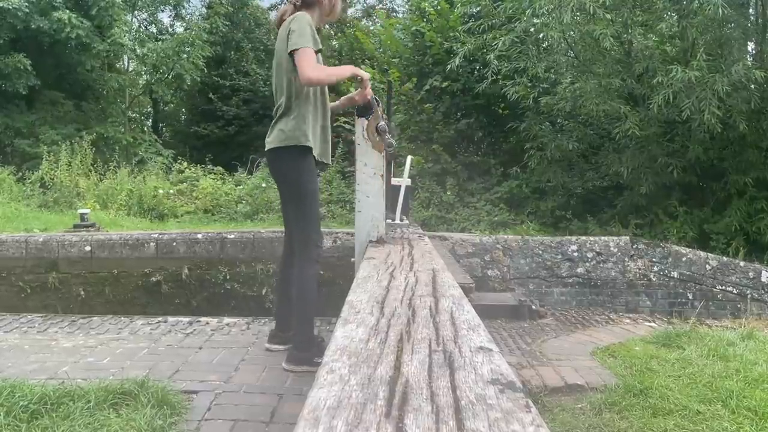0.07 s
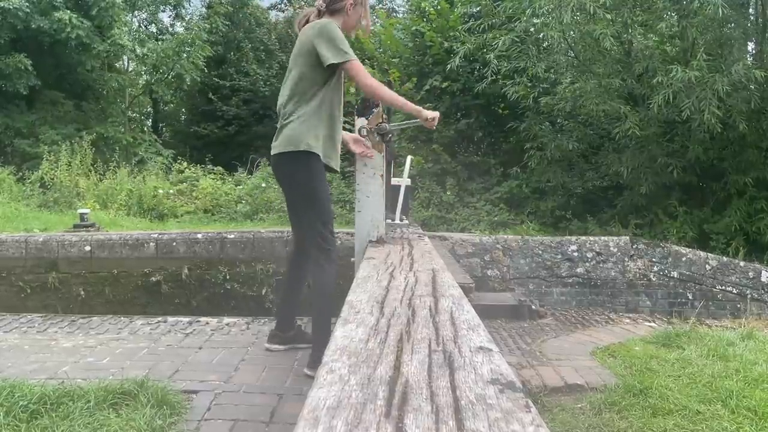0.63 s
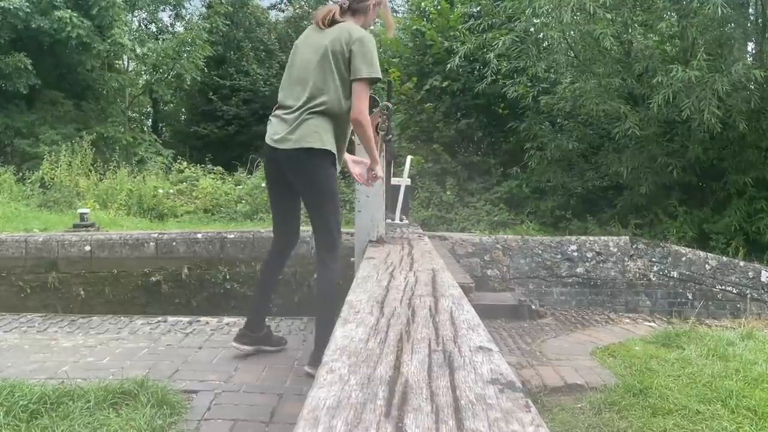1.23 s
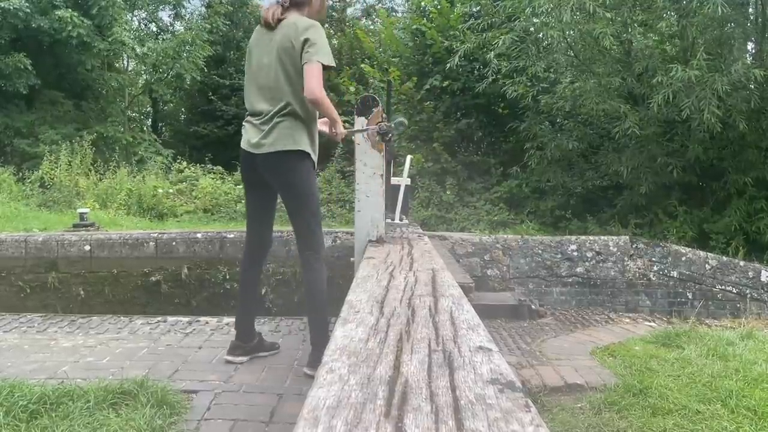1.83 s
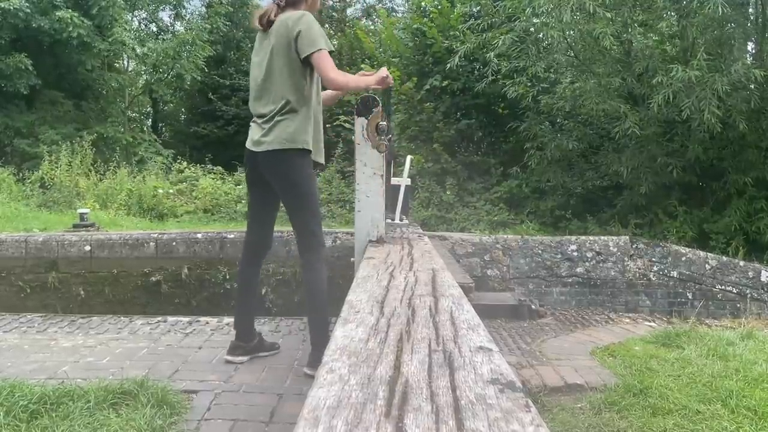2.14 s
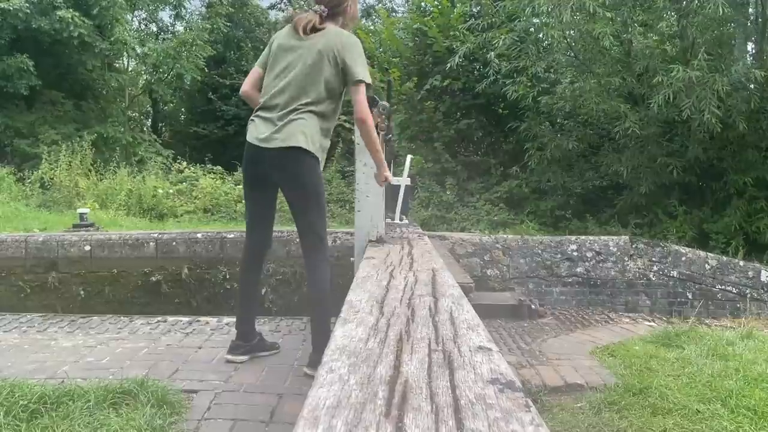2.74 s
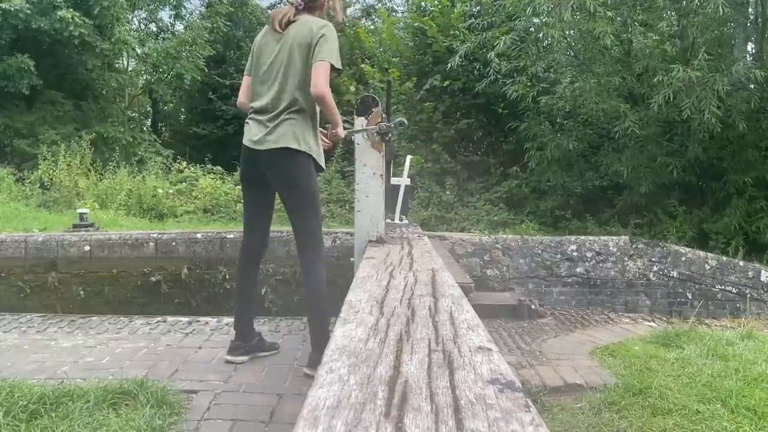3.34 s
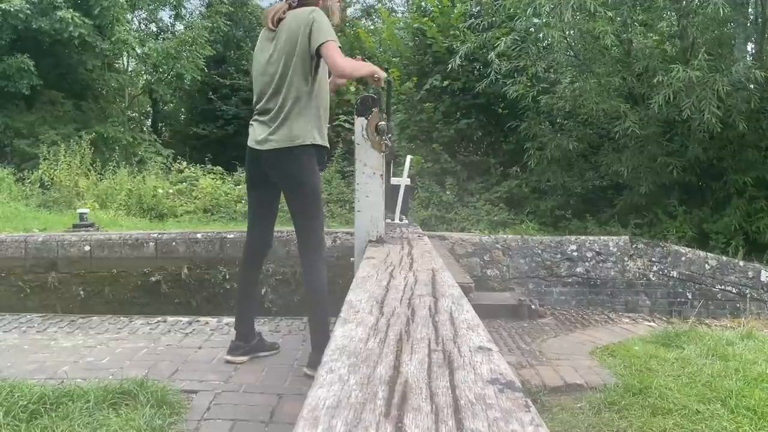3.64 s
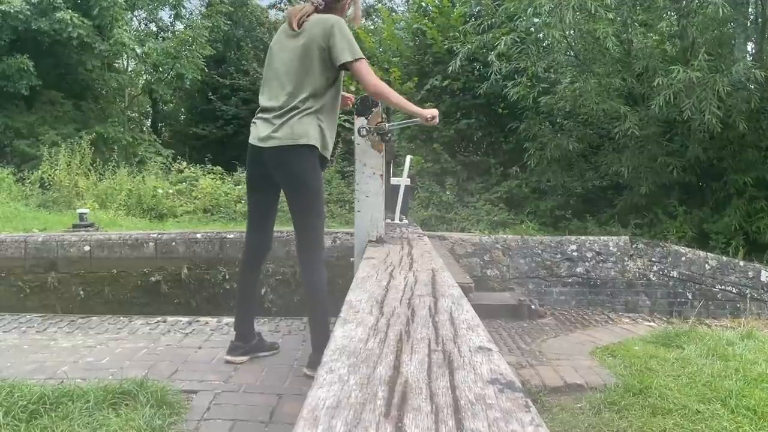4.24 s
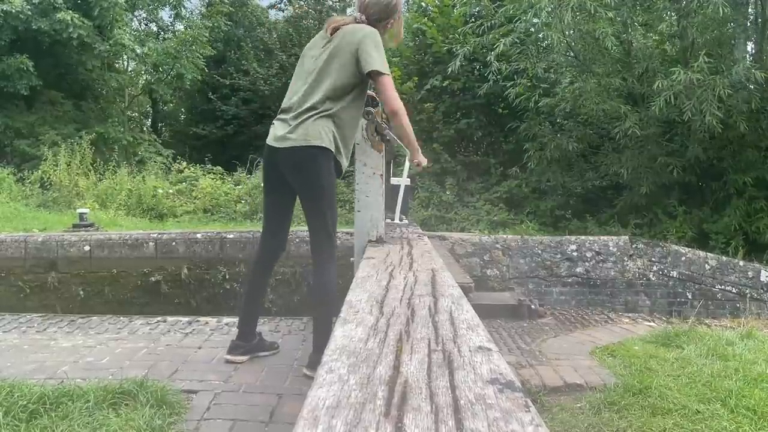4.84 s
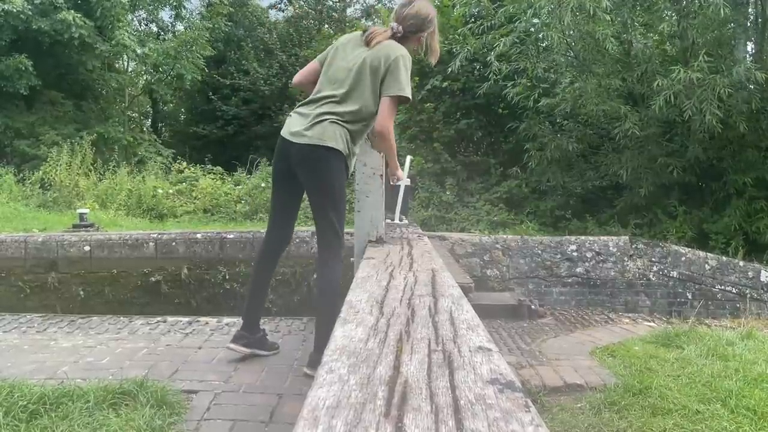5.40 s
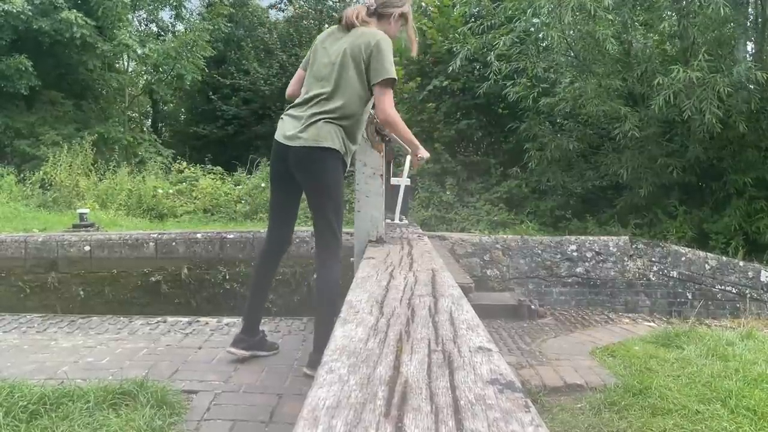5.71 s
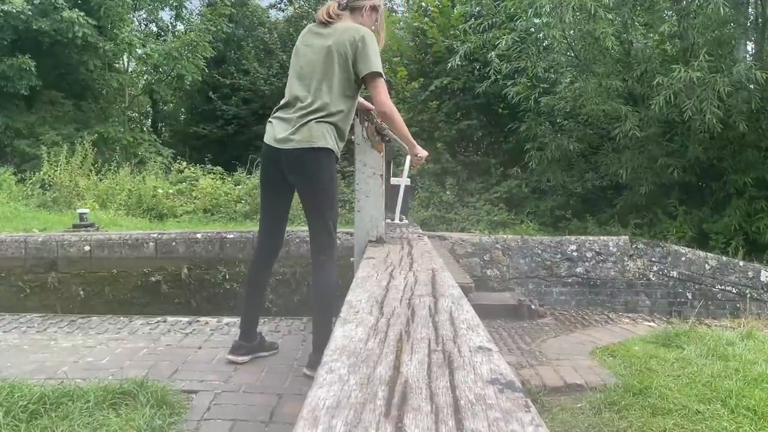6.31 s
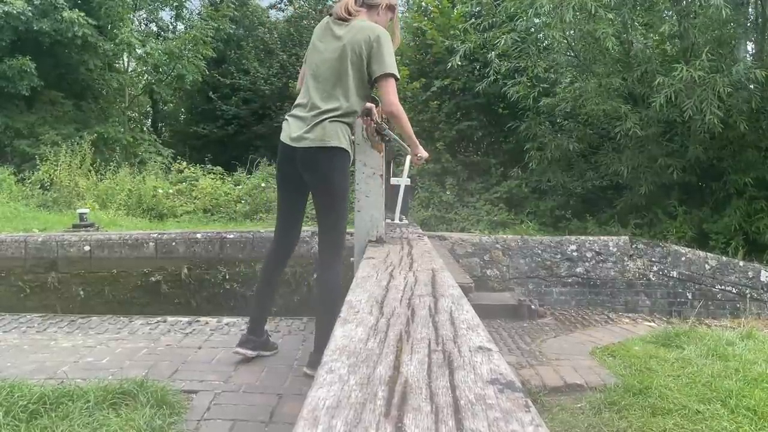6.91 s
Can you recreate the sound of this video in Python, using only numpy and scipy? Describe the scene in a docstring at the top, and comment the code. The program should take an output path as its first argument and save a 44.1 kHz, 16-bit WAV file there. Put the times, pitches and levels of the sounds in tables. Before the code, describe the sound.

Sharp, ringing ratchet clicks and iron clanks come in irregular clusters outdoors, then a single clunk, over a faint rush of water and leaves.

```python
"""Iron teeth knock and shake a timber gate: paddle gear is being wound by hand on a canal lock,
a few metres away in the open air, with water and leaves rushing faintly behind.
With each push of the windlass the gear clanks and crunches, while a steel pawl drops over the
ratchet, bounces and rings. At the end the load settles back on the pawl with one hard clunk."""
import sys
import numpy as np
from scipy import signal
from scipy.fft import rfft, irfft, next_fast_len
from scipy.io import wavfile

SR = 44100
rng = np.random.default_rng(int(sys.argv[2]) if len(sys.argv) > 2 else 0)


def wav_record(signal):
    """Record a signal, one row per channel, as 16-bit PCM in the file named by sys.argv[1]."""
    frames = np.transpose(np.atleast_2d(signal))
    bounded = np.clip(frames, -1, 1)
    # unit amplitude maps onto the largest positive 16-bit level
    quanta = np.round(bounded * 32767).astype(np.int16)
    wavfile.write(sys.argv[1], SR, quanta)


N = 311346

# Teeth knock together under the push. Each row: start in seconds, thud, clank and clack levels in dB,
# then gate, post and clack pitches in Hz.
KNOCKS = [(0.0, -11, -31, -29.5, 215, 490, 3630), (0.099, -17, -37, -56, 156, 530, 2930),
          (0.241, -24, -38, -46, 209, 477, 2700), (0.266, -20, -36.5, -43, 156, 340, 2660),
          (0.656, -10.5, -29, -32, 160, 360, 3740), (0.772, -19, -31, -31, 150, 525, 3800),
          (0.874, -11, -29.5, -32, 156, 560, 3290), (0.897, -21, -32, -35, 156, 480, 3500),
          (0.951, -10, -33.5, -38, 274, 344, 2880), (0.987, -14, -34.5, -32.5, 150, 545, 3080),
          (1.744, -12, -32, -37, 177, 470, 3150), (1.764, -17.5, -30.5, -34, 156, 538, 3280),
          (1.977, -11.5, -35.5, -41, 150, 370, 4000), (1.999, -22, -29.5, -30.5, 231, 543, 3730),
          (2.045, -18.5, -31, -57, 296, 543, 3840), (2.166, -16, -33.5, -40, 150, 460, 3380),
          (2.485, -13, -28, -45, 274, 490, 2750), (2.501, -11, -33, -34.5, 263, 535, 3820),
          (2.628, -18, -33.5, -41, 156, 490, 3810), (2.653, -20.5, -33, -39, 215, 470, 3350),
          (2.695, -22, -35.5, -49, 177, 538, 3800), (2.731, -10.5, -29, -32, 156, 468, 3430),
          (2.753, -14, -29, -27.5, 263, 482, 2800), (2.8, -8, -32.5, -28.5, 188, 506, 3060),
          (2.832, -14, -38, -42, 150, 441, 3350), (3.11, -14.5, -33.5, -39, 193, 500, 2870),
          (3.125, -13, -31, -26, 161, 496, 3400), (3.161, -32, -25.5, -26, 215, 585, 3930),
          (3.174, -10, -26.5, -27, 215, 610, 3300), (3.335, -29, -44, -42.5, 156, 387, 2800),
          (3.462, -12, -37, -36, 209, 500, 2930), (3.485, -14.5, -26.5, -29, 215, 495, 3870),
          (3.545, -19.5, -31, -30, 183, 477, 3320), (3.627, -17.5, -37, -60, 150, 634, 3430),
          (4.006, -21.5, -38.5, -59, 149, 480, 3370), (4.046, -14.5, -26, -35, 269, 475, 2820),
          (4.087, -14.5, -33.5, -42, 150, 545, 3290), (4.828, -15, -28, -34.5, 209, 635, 3350),
          (4.843, -24, -40, -35.5, 156, 535, 3910), (4.875, -18.5, -30.5, -51, 156, 554, 3880),
          (4.916, -10.5, -25, -34.5, 215, 547, 3900), (4.939, -23, -47, -28, 247, 344, 3380),
          (5.021, -15.5, -34.5, -36.5, 166, 520, 2840), (5.097, -22.5, -38, -49, 209, 470, 2870),
          (5.522, -26.5, -42, -49.5, 220, 475, 4320)]


def gear():
    """The gear knocks under each push and lurches just before each pawl drop, as a tooth slips past."""
    lead_s, lurch_db, lurch_hz = 0.00299, -21, (199, 542, 3290)
    lurches = [(s - lead_s, lurch_db, shimmer_db - 2.5, shimmer_db - 11, *lurch_hz)
               for s, _, shimmer_db, _ in PAWL_DROPS]
    s, thud_db, clank_db, clack_db, gate_hz, post_hz, clack_hz = np.transpose(KNOCKS + lurches)
    return (gate_thud(s, thud_db, gate_hz)
            + post_knock(s, (thud_db + clank_db) / 2, post_hz)
            + iron_clank(s, clank_db)
            + tooth_clack(s, clack_db, clack_hz)
            + grit_crunch(s, (clank_db + clack_db) / 2))


# The timber's low notes. Each row: pitch in Hz, level in dB, ring time to -60 dB (t60) in seconds.
GATE_MODES = [(95, -22.5, .4), (156, -13.5, .18), (184, -14.5, .13), (215, -11, .14), (259, -12.5, .17),
              (280, -15.5, .13)]
# The dull wash around them. Each row: frequency in Hz, density in dB, t60 in seconds.
THUD_BANDS = [(70, -21, 0.34), (100, -6.5, 0.35), (136, -3.5, 0.37), (212, 4, 0.25), (323, -9.5, 0.2),
              (444, -1, 0.1), (764, -12.5, 0.093), (1200, -20, 0.096)]


def gate_thud(s, level_db, pitch_hz):
    """Each blow travels down into the timber gate, which answers with a hollow thud."""
    timber = struck(s, level_db, GATE_MODES, pitch_hz, rise_s=0.0048)
    return timber + overtones(s, level_db - 11.5, THUD_BANDS, rise_s=0.005)


# The post that holds the gear. Each row: pitch in Hz, level in dB, t60 in seconds.
POST_MODES = [(346, -9, .12), (392, -9, .15), (474, -4.5, .12), (505, -7, .1), (547, -5.5, .12),
              (590, -9, .1), (640, -8, .1)]


def post_knock(s, level_db, pitch_hz):
    """The post stands between iron and timber and takes a share of both."""
    return from_db(-2.0) * struck(s, level_db, POST_MODES, pitch_hz, rise_s=0.0034)


# Cast iron wheels and rack. Each row: pitch in Hz, level in dB, t60 in seconds.
IRON_MODES = [(645, -3, .1), (695, -5, .1), (912, -5, .13), (1060, -4, .12), (1183, -7, .12),
              (1400, -4, .13), (1440, -4, .1), (1500, -7, .12), (1860, -8.5, .1)]
# Their dense overtones. Each row: frequency in Hz, density in dB, t60 in seconds.
CLANK_BANDS = [(406, 15.5, 0.1), (720, -27, 0.079), (1030, 7.5, 0.2), (1420, 8, 0.072), (2120, -5, 0.069),
               (3000, -33, 0.1)]


def iron_clank(s, level_db):
    """The wheels and rack ring briefly at each blow."""
    wheels = ring(s, level_db, IRON_MODES, spread_db=2, detune=.008, rise_s=.003)
    return from_db(-2.0) * wheels + overtones(s, level_db - 3.5, CLANK_BANDS, rise_s=0.0018)


# One tooth's ping. Each row: multiple of the clack pitch, level in dB, t60 in seconds.
TOOTH_MODES = [(.85, -5, .012), (1, 1, .02), (1.14, -5.5, .012)]
# The bright edge of the clack. Each row: frequency in Hz, density in dB, t60 in seconds.
CLACK_BANDS = [(1510, -38, 0.041), (2460, 8, 0.074), (3700, 0, 0.11), (4700, -7, 0.057), (7000, -2, 0.046),
               (14000, -40, .04)]


def tooth_clack(s, level_db, pitch_hz):
    """A tooth clacks and scrapes home in two quick catches, each at a slightly different pitch."""
    clack = overtones(s, level_db - 5.5, CLACK_BANDS, rise_s=0.0035)
    catch_s, catch_db = chatter(s + 0.001003, level_db + 7.5, gap_s=.003, step_db=-6, count=2)
    catch_hz = np.repeat(pitch_hz, 2)
    catches = ring(catch_s, catch_db, TOOTH_MODES, spread_db=1, detune=.014, rise_s=.0008, pitch=catch_hz)
    return clack + catches


# Grit between the teeth. Each row: frequency in Hz, density in dB, t60 in seconds.
GRIT_BANDS = [(600, -1, 0.016), (1400, -11, 0.02), (3300, 1.5, 0.008), (4500, -7.5, 0.014),
              (6500, -9, 0.0066), (12000, -29, .008)]


def grit_crunch(s, level_db):
    """The rough flanks slide on after each blow in a short run of tiny slips."""
    slip_s, slip_db = chatter(s, level_db, gap_s=.005, step_db=-1.5, count=4)
    return overtones(slip_s, slip_db + 0.35 + rng.normal(0, 1, len(slip_s)), GRIT_BANDS, rise_s=0.000093)


# The colour of the rush and of the hiss. Each row: frequency in Hz, density in dB.
RUSH_SPECTRUM = [(22, -24), (45, -5), (75, 1), (115, -3), (160, -6), (300, -8), (450, -10.5), (800, -16),
                 (1500, -22), (3000, -27.5), (6000, -42), (8000, -38)]
HISS_SPECTRUM = [(4000, -12), (6000, -4), (8000, -21), (10000, -10), (13000, -15), (15000, -4)]
# The slow swell of the rush. Each row: time in seconds, relative level in dB.
RUSH_SWELL = [(0, -40.5), (.5, -37), (1.4, -39), (2.4, -38), (3.3, -40), (4.401, -36.5), (5.4, -39.5),
              (6.1, -39), (6.6, -37), (7.06, -37)]
# The width of this bed. Each row: frequency in Hz, left-right likeness from 0 to 1.
AIR_LIKENESS = [(60, 0.89), (400, 0.94), (2000, 0.46), (5000, 0.76), (9000, 1)]


def water_and_leaves():
    """A distant rush ripples and swells slowly under a thin, steady hiss."""
    swell_db = np.interp(np.arange(N) / SR, *np.transpose(RUSH_SWELL))
    rush = sum(band * waver(1.0, per_s=9) for _, band in noise_bands(RUSH_SPECTRUM, AIR_LIKENESS))
    hiss = sum(band for _, band in noise_bands(HISS_SPECTRUM, AIR_LIKENESS))
    return from_db(swell_db - 1.5) * rush + from_db(-55.5) * hiss


# The pawl drops over a tooth. Each row: start in seconds, then click, shimmer and bending levels in dB.
PAWL_DROPS = [(0.0599, -20, -28, -45), (0.1481, -16.5, -32.5, -43), (0.618, -19.5, -27.5, -27.5),
              (0.7052, -19, -27.5, -36), (0.8515, -19.5, -32, -29), (0.908, -21, -28, -37),
              (1.7053, -17.5, -27, -30.5), (1.9018, -19.5, -33, -34), (2.0571, -19.5, -26, -36),
              (2.136, -30, -29.5, -31.5), (2.4703, -18, -25, -36), (2.558, -21, -30, -35),
              (2.7111, -13, -37, -36), (2.7683, -26, -28.5, -45), (3.1377, -8.5, -30.5, -31),
              (3.417, -17, -34.5, -32.5), (3.5524, -18, -30, -31), (3.699, -18, -29.5, -32),
              (4.04, -17.5, -31, -31), (4.7928, -17, -45, -32.5), (4.9002, -11, -31, -47),
              (4.963, -25, -30.5, -30.5)]
# It rebounds unevenly on the moving wheel. Each row: start in seconds, click level in dB.
PAWL_REBOUNDS = [(0.0653, -15), (0.083, -20), (0.095, -22), (.105, -24), (0.166, -19), (0.63, -19),
                 (.636, -23), (.643, -24), (0.7096, -22), (0.857, -16.5), (0.8697, -17), (.886, -24),
                 (0.8944, -17), (0.922, -18), (1.717, -23), (1.7224, -16.5), (1.9184, -25), (1.9342, -25),
                 (2.0632, -17.5), (2.08, -20), (2.093, -25), (2.1461, -18), (2.16, -21), (2.165, -23),
                 (2.477, -25.5), (2.58, -23), (2.588, -27), (2.72, -14.5), (2.733, -22), (2.7568, -19),
                 (2.7906, -23.5), (3.1453, -15), (3.1608, -20), (3.171, -20), (3.182, -19.5),
                 (3.4298, -19.5), (3.45, -26), (3.5618, -16.5), (3.575, -21), (3.579, -21), (3.5888, -22),
                 (3.71, -20), (4.042, -25.5), (4.0487, -18.5), (4.0603, -18), (4.0677, -26), (4.0799, -25),
                 (4.8005, -15.5), (4.809, -28), (4.904, -21), (4.9081, -16), (4.9197, -22), (4.978, -17.5)]


def pawl():
    """The pawl lands on the ratchet; a rebound is a light touch, more click than ring."""
    rebounds = [(s, db, db - 13.5, db - 18.5) for s, db in PAWL_REBOUNDS]
    s, click_db, shimmer_db, bending_db = np.transpose(PAWL_DROPS + rebounds)
    return ratchet_tick(s, click_db, shimmer_db) + pawl_ring(s, shimmer_db, bending_db)


# The tick and the wheel's jangle. Each row: frequency in Hz, density in dB, t60 in seconds.
TICK_BANDS = [(650, 6, 0.23), (1440, -2.5, 0.077), (2620, 2.5, 0.038), (3970, -6, 0.016),
              (5800, 4.5, 0.022), (10100, 4.5, 0.02), (12000, 3, 0.014), (15500, -7, 0.013)]
JANGLE_BANDS = [(694.5, 10, 0.18), (1360, 10.5, 0.14), (2070, 14, 0.056), (3300, 7.5, 0.13),
                (4370, 0, 0.05), (6100, 10, 0.1), (8000, 2, 0.14), (9900, -6, 0.27), (12500, -8, .13)]


def ratchet_tick(s, click_db, shimmer_db):
    """Each landing ticks sharply, skips three times on the tooth and sets the ratchet wheel jangling."""
    skip_s, skip_db = chatter(s + 0.006, shimmer_db - 10, gap_s=0.008, step_db=4, count=3)
    tick = overtones(np.append(s, skip_s), np.append(click_db - 6.5, skip_db), TICK_BANDS, rise_s=0.0002)
    return tick + overtones(s, shimmer_db - 8.0, JANGLE_BANDS, rise_s=0.0099)


# The pawl's voices. Each row: pitch in Hz, level in dB, t60 in seconds.
SHIMMER_MODES = [(5660, -15, .1), (5696, -13, .16), (5690, -9, .05), (6130, -14.5, .05), (6290, -13, .06),
                 (7112, -15, .22), (7462, -6.5, .42), (7479, -5.5, .42), (9102, -17, .42),
                 (9118, -15.5, .42), (9750, -14, .06), (11750, -16.5, .08)]  # its high modes
BENDING_MODES = [(2503, -15, .12), (2486, 1.5, .08)]  # its bending, damped against the tooth
FREE_MODES = [(2479, -3, .55), (2488, 0, .55)]  # the same bending clear of the tooth: a close pair that beats


def pawl_ring(s, shimmer_db, bending_db):
    """The steel pawl rings, wavering as it rides on the teeth."""
    shimmer = ring(s, shimmer_db, SHIMMER_MODES, spread_db=1.5, detune=.0008, rise_s=.0005)
    shimmer *= waver(2, per_s=110) * waver(2, per_s=30)
    bending = ring(s, bending_db, BENDING_MODES, spread_db=1, detune=.003, rise_s=.0005)
    bending *= waver(3, per_s=220)
    # clear of the tooth, the ring swells again and lingers
    free = ring(s, shimmer_db, FREE_MODES, spread_db=1, detune=.0003, rise_s=.04)
    free *= waver(2.5, per_s=30)
    return from_db(-3.5) * shimmer + from_db(0.8) * bending + from_db(-18.5) * free


# The load settles on the pawl. Each row: start in seconds, thud level in dB, crack level in dB.
CLUNK_HITS = [(5.7053, -18.5, -37), (5.71, -23, -22.5), (5.712, -21, -15.5), (5.7202, -12, -33)]
# The locked frame and the jammed pawl. Each row: pitch in Hz, level in dB, t60 in seconds.
FRAME_MODES = [(94, -16, .38), (151, -11.5, .22), (209, -7.5, .13), (364, -16, .11), (391, -1.5, .115),
               (433, -6, .1), (485, -12, .09), (546, 2, .1), (612, -15, .06), (690, -9, .06),
               (875, -16, .045)]
JAMMED_MODES = [(1180, -5, 0.055), (1385, -4, 0.055), (1745, -7, 0.07), (3330, 2, 0.014), (3700, -9, .014),
                (5200, -9, .016), (6550, -6, 0.027), (10600, -28, .035)]
# The crack on top. Each row: frequency in Hz, density in dB, t60 in seconds.
CRACK_BANDS = [(200, -3, 0.17), (646, 1.5, 0.08), (1380, -21, 0.052), (2100, -15, 0.097), (3430, -2, 0.027),
               (5230, -9, 0.042), (8000, -15, 0.019), (11000, -16, 0.049), (15500, -26, .03)]


def clunk():
    """The pawl jams in a tooth: held tight, its ring is choked, and the whole frame takes the blow."""
    s, thud_db, crack_db = np.transpose(CLUNK_HITS)
    frame = ring(s, thud_db, FRAME_MODES, spread_db=.5, detune=.002, rise_s=.0008)
    jam = ring(s, crack_db, JAMMED_MODES, spread_db=1, detune=.005, rise_s=.0004)
    return frame + jam + overtones(s, crack_db + 3.0, CRACK_BANDS, rise_s=0.00046)


def from_db(db):
    """Decibels as a gain."""
    return 10 ** (np.asarray(db) / 20)


def at_hz(points, hz, column=1):
    """One column of a table, read on a log-frequency axis."""
    points = np.array(points)
    return np.interp(np.log(hz + 1), np.log(points[:, 0] + 1), points[:, column])


def waver(depth_db, per_s):
    """A gain that wanders at random about 1."""
    steps = np.arange(N) * per_s / SR
    turns = rng.standard_normal(int(steps[-1]) + 2)
    return from_db(depth_db * np.interp(steps, np.arange(len(turns)), turns))


def chatter(times, level_db, gap_s, step_db, count):
    """Loose metal turns each blow into an uneven run of touches, changing by step_db each time."""
    gaps = gap_s * rng.uniform(.4, 1.6, (len(times), count))
    touches = times[:, None] + np.cumsum(gaps, axis=1) - gaps[:, :1]
    return touches.ravel(), (level_db[:, None] + step_db * np.arange(count)).ravel()


def ring(times, level_db, modes, spread_db, detune, rise_s, pitch=1):
    """Every blow strikes each mode with its own strength and, as the contact shifts, its own tuning."""
    out = np.zeros((2, N + SR))
    starts = np.round(times * SR).astype(int)
    luck = rng.standard_normal((len(times), len(modes), 3))
    for start, db, scale, draws in zip(starts, level_db, pitch * np.ones(len(times)), luck):
        for (hz, mode_db, t60), (strength, tuning, skew) in zip(modes, draws):
            t = np.arange(int(min(t60, 1) * SR)) / SR
            swing = np.exp(t * (2j * np.pi * hz * scale * (1 + detune * tuning) - np.log(1000) / t60))
            swing *= from_db(db + mode_db + spread_db * strength) * (1 - np.exp(-t / rise_s))
            # each mode radiates its own way and reaches the two sides a little out of step
            out[:, start:start + len(t)] += np.imag(swing * np.exp(.2j * skew * np.array([[1], [-1]])))
    return out[:, :N]


def struck(times, level_db, modes, favoured_hz, rise_s):
    """Where a blow lands decides which modes answer most: those near its favoured pitch."""
    boost_db, width_octaves = 7, .14
    out = 0
    for mode in modes:
        near = np.exp(-(np.log2(mode[0] / favoured_hz) / width_octaves) ** 2)
        out = out + ring(times, level_db + boost_db * near, [mode], spread_db=1, detune=.01, rise_s=rise_s)
    return out


def noise_bands(spectrum, likeness):
    """Half-octave bands of stereo noise with a total rms of 1; yields each centre in Hz and its band."""
    edges = 22 * 2 ** np.arange(0, 9.6, .5)
    centres = np.sqrt(edges[1:] * edges[:-1])
    inside = (edges[1:] > spectrum[0][0]) & (edges[:-1] < spectrum[-1][0])
    gains = from_db(at_hz(spectrum, centres)) * np.sqrt(centres) * inside
    white = rng.standard_normal((2, 2, N))
    for k in np.flatnonzero(inside):
        band = signal.sosfilt(signal.butter(2, edges[k:k + 2], "band", fs=SR, output="sos"), white[k % 2])
        mid, side = band / band.std()
        alike = at_hz(likeness, centres[k])
        pair = np.sqrt((1 + alike) / 2) * mid + np.sqrt((1 - alike) / 2) * np.array([side, -side])
        yield centres[k], pair * gains[k] / np.linalg.norm(gains)


def fade(x, t60):
    """Every impulse leaves an exponential tail of its own height."""
    return signal.lfilter([1], [1, -from_db(-60 / (t60 * SR))], x + 1e-18)


# The width of the gear's noise. Each row: frequency in Hz, left-right likeness from 0 to 1.
GEAR_LIKENESS = [(100, .92), (600, .74), (2500, .78), (10000, .88)]


def overtones(times, level_db, body, rise_s):
    """Modes too dense to tell apart: each blow feeds energy to bands that die at their own rates."""
    starts = np.clip(np.round(times * SR).astype(int), 0, N - 1)
    impulses = np.bincount(starts, from_db(level_db) ** 2, N)
    lag = np.exp(-1 / (rise_s * SR + 1))
    energy = signal.lfilter([1 - lag], [1, -lag], impulses + 1e-18)
    return sum(band * np.sqrt(fade(energy, at_hz(body, hz, column=2) / 2))
               for hz, band in noise_bands(body, GEAR_LIKENESS))


# The outdoor tail. Each row: frequency in Hz, density in dB, t60 in seconds.
SCATTER_BANDS = [(79.4, 19, 0.45), (210, 2, 0.64), (490, 0, 0.27), (1900, -2, 0.44), (6070, -3.5, 0.61),
                 (14800, 4.5, 0.26)]


def scatter(x, wet_db):
    """Lock walls and trees send back a faint diffuse tail."""
    t = np.arange(SR) / SR
    tail = sum(band[:, :SR] * from_db(-60 * t / at_hz(SCATTER_BANDS, hz, column=2))
               for hz, band in noise_bands(SCATTER_BANDS, GEAR_LIKENESS))
    tail /= np.sqrt(np.sum(tail ** 2) / 2)
    return from_db(wet_db) * signal.fftconvolve(x.mean(axis=0)[None], tail, axes=1)[:, :N]


def scene():
    """The winding and the closing clunk, each with its tail, over the bed of water and leaves."""
    winding, settling = pawl() + gear(), clunk()
    tails = scatter(winding, wet_db=-14.0) + scatter(settling, wet_db=-15.0)
    return winding + settling + tails + water_and_leaves()


# Phase between the two microphone ports. Each row: frequency in Hz, left's lead in radians.
PORT_PHASE = [(0, 0), (690, .6), (1640, .4), (2500, 1), (4200, .5), (5100, .7), (6500, -.2), (7450, -2.4),
              (8200, -3.1), (9100, -4.1), (11300, -6.3), (15000, -9.4)]
# Their balance. Each row: frequency in Hz, left minus right in dB.
PORT_BALANCE = [(60, -1), (150, -2), (290, -4), (640, -1.5), (1400, -1.5), (3100, 1.5), (6800, -0.5),
                (15000, 0.5)]


def record(dry):
    """The two ports differ in phase and level; the highest treble rolls off and the top is cut."""
    rolloff_hz, cutoff_hz = 10270, 16000
    size = next_fast_len(N + SR)
    hz = np.arange(size // 2 + 1) * SR / size
    lead = np.interp(hz, *np.transpose(PORT_PHASE))
    left = from_db(at_hz(PORT_BALANCE, hz) / 2) * np.exp(.5j * lead)
    ports = irfft(rfft(dry, size) * np.array([left, 1 / left]), size)[:, :N]
    ports = signal.sosfilt(signal.butter(2, rolloff_hz, fs=SR, output="sos"), ports)
    return signal.sosfilt(signal.ellip(10, .1, 80, cutoff_hz, fs=SR, output="sos"), ports)


dry = scene()
out = record(dry)
wav_record(out)
```